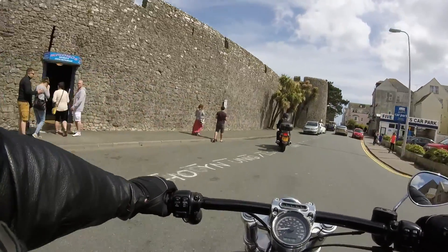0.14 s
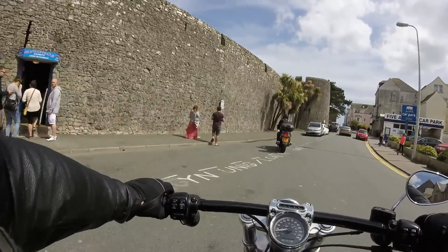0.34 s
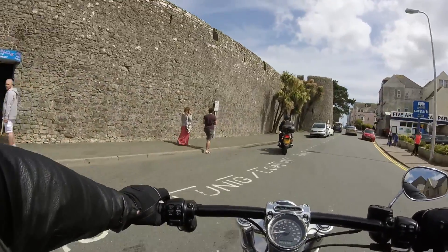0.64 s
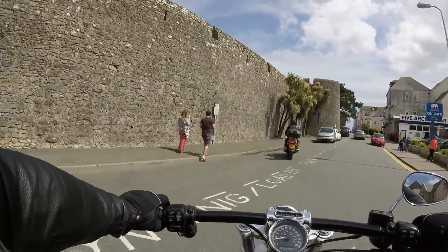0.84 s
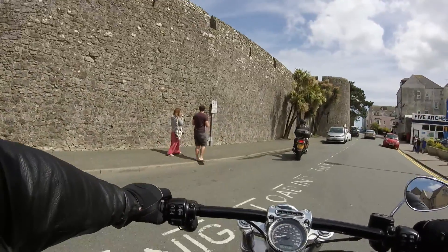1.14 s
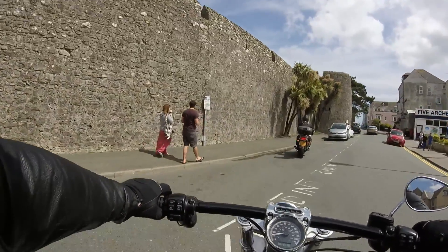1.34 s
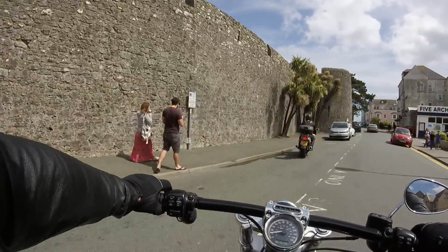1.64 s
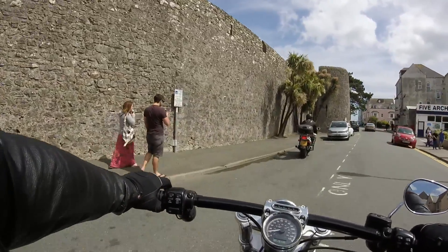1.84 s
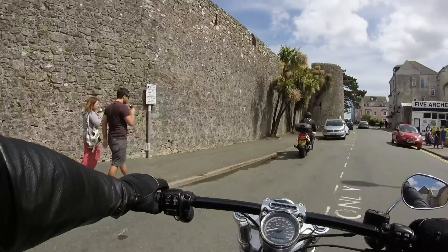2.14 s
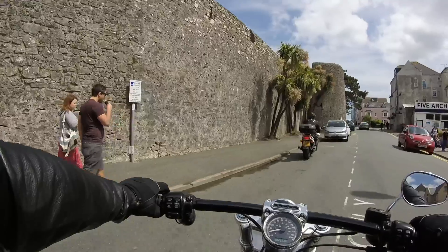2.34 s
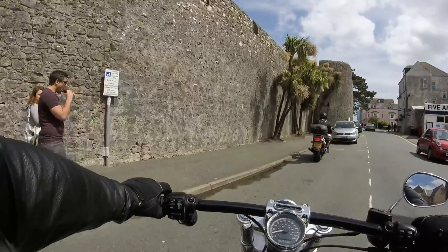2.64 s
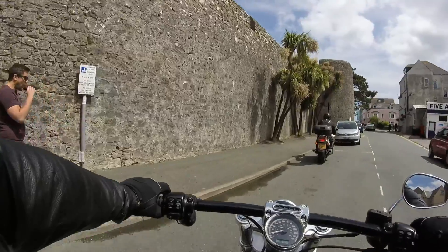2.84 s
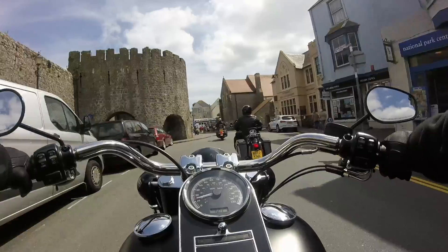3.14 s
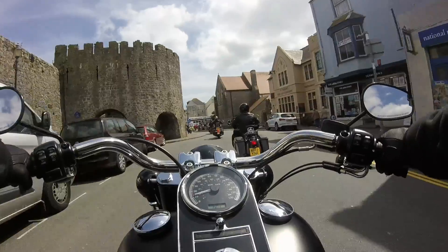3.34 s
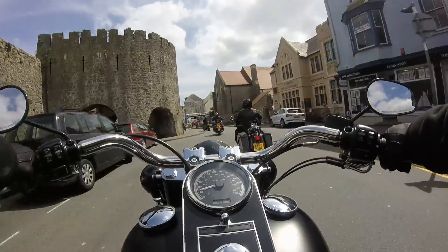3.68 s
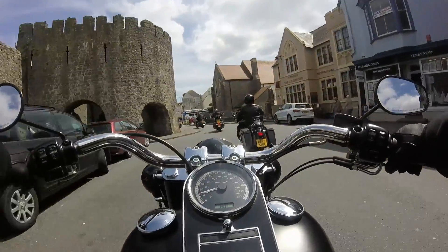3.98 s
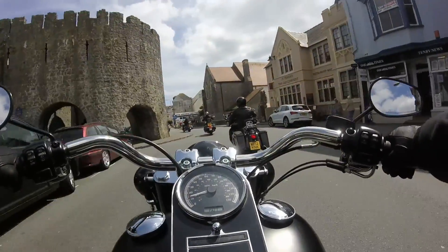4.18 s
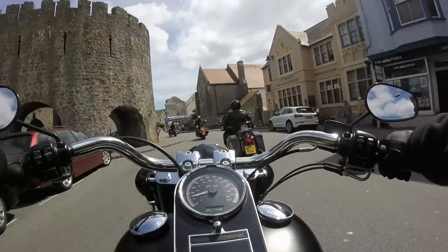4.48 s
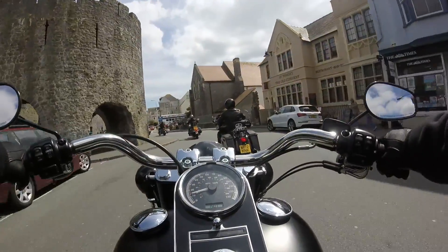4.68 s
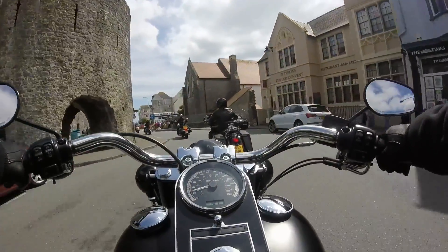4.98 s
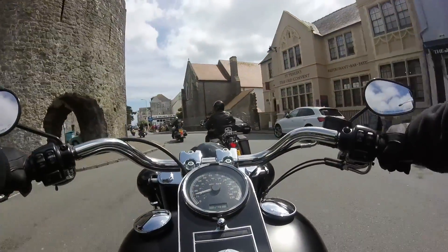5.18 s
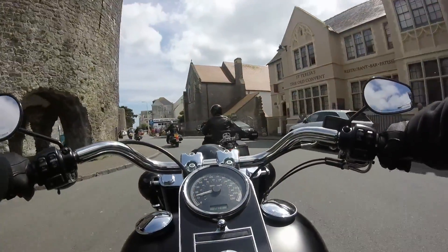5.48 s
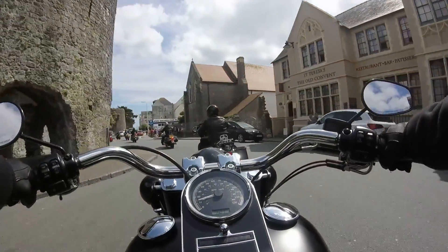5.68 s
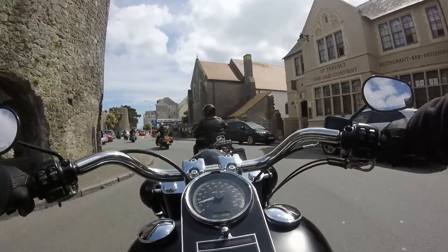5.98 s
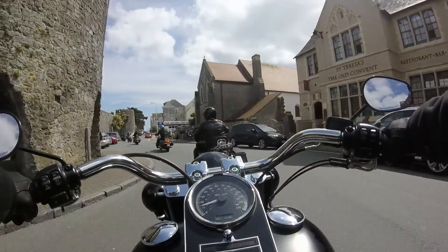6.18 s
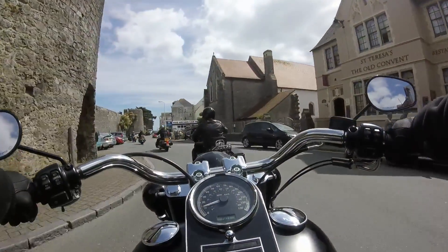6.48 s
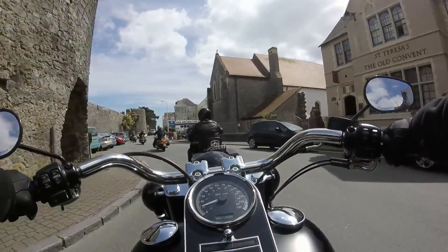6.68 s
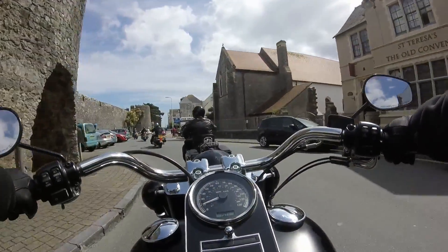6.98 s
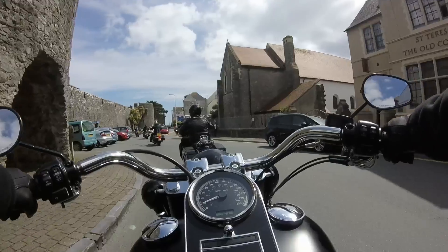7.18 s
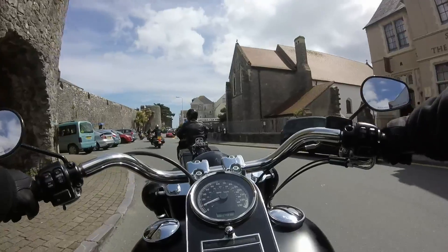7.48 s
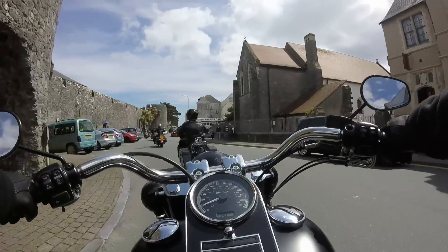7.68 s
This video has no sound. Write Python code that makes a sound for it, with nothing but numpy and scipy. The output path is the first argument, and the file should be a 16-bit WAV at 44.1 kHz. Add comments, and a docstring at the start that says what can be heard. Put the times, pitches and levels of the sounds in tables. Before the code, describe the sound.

From the saddle, a loud open-piped V-twin motorcycle lopes down toward idle, then a click cuts to a quieter muffled one that coasts and idles.

```python
"""Riding slowly along a street, heard from the saddles of two big V-twin motorcycles in turn.
First an open-piped one lopes loudly down to near idle, with cracks, a lever click and a faint whistle.
A dry click switches to a well muffled one: it cruises, knocks over a bump, then coasts with the throttle
shut, clanking and ticking, and sinks to idle. Firings are gliding sine rings; gas, valve gear and street
are filtered noise; blows are dying modes."""
import sys
import numpy as np
from scipy import signal
from scipy.fft import rfft, irfft
from scipy.io import wavfile
from scipy.ndimage import uniform_filter1d

SR = 44100
rng = np.random.default_rng(int(sys.argv[2]) if len(sys.argv) > 2 else 0)


def log_audio(samples):
    """Write samples as a 16-bit WAV file to the path given in sys.argv[1]."""
    # one column per channel
    frames = np.atleast_2d(samples).T
    # limit to full scale, then quantise
    limited = np.clip(frames, -1, 1)
    pcm = np.round(limited * 32767).astype(np.int16)
    wavfile.write(sys.argv[1], SR, pcm)


N = 344862
TIME = np.arange(N) / SR


def amp(db):
    """Decibels to gain."""
    return 10 ** (np.asarray(db) / 20)


def unit(x):
    """Scales to rms 1."""
    return x / np.sqrt(np.mean(x ** 2) + 1e-20)


def levelled(x):
    """Scales to rms 1 over every few engine cycles."""
    power = abs(uniform_filter1d(x ** 2, size=SR // 3))
    return x / np.sqrt(power + 1e-9)


def add(mix, start_s, sound):
    """Mixes a sound in from start_s, dropping what falls outside."""
    at = int(round(start_s * SR))
    sound = sound[max(-at, 0):]
    part = mix[max(at, 0):][:len(sound)]
    part += sound[:len(part)]


def curves(rows):
    """One control, linear between rows, for each column after the time."""
    row_s, *columns = np.transpose(rows)
    return [np.interp(TIME, row_s, column) for column in columns]


def plateau(start_s, rise_s, hold_s, fall_s):
    """An envelope from 0 up to 1 and back."""
    return np.interp(TIME, start_s + np.cumsum([0, rise_s, hold_s, fall_s]), [0, 1, 1, 0])


def noise():
    """White noise."""
    return rng.standard_normal(N)


def colour(x, spectrum, skirt_db=60):
    """Filters by a spectrum that falls by skirt_db an octave beyond its ends; rms 1."""
    hz, db = np.transpose(spectrum)
    octave = np.log2(np.fft.rfftfreq(N, 1 / SR) + 1)
    known = np.log2(hz + 1)
    outside = abs(octave - np.clip(octave, known[0], known[-1]))
    gain = amp(np.interp(octave, known, db) - skirt_db * outside)
    return unit(irfft(rfft(x) * gain, N))


def sing(rings, shake):
    """Shaking keeps narrow resonances sounding."""
    spectrum, f = rfft(shake), np.fft.rfftfreq(N, 1 / SR)
    out = np.zeros(N)
    for hz, width_hz, db in rings:
        resonance = 1 / (1 + 1j * (f - hz) / width_hz) ** 2
        out += amp(db) * unit(irfft(spectrum * resonance, N))
    return out


def bursts(turns, angles, decay_cycles, steady):
    """Noise that flares at the given points of each cycle and dies away."""
    gate = sum(np.exp(-((turns - angle) % 1) / decay_cycles) for angle in angles)
    return (steady + gate) * noise()


def rattle(per_s, spread_db):
    """Random small metal contacts, a few of them larger or smaller; rms 1."""
    size = amp(spread_db * np.minimum(rng.exponential(1, N), 4))
    hit = rng.random(N) < per_s / SR
    return unit(size * noise() * hit)


def strike(modes, contact_s, tuning=1):
    """The dying ring of one blow; a longer contact gives a softer start."""
    t = np.arange(SR // 8) / SR
    ring = sum(amp(db - 60 * t / t60_s) * np.sin(2 * np.pi * hz * tuning * t) for hz, db, t60_s in modes)
    return ring * (1 - np.exp(-(t / contact_s) ** 2))


def crack(decay_s):
    """The broad tick of metal meeting metal."""
    t = np.arange(SR // 30) / SR
    return rng.standard_normal(len(t)) * np.exp(-t / decay_s)


def crank(speed, start):
    """Cycles turned so far, given the position in the cycle at the first row."""
    turns = np.cumsum(curves(speed)[0]) / SR
    return turns - np.interp(speed[0][0], TIME, turns) + start


def pipe(turns, rings, uneven_db, jitter_s, detune, warmth=1):
    """Each firing rings the exhaust; pitch glides as the piston changes the open volume. Even rms 1."""
    out, cycles = np.zeros(N), np.arange(-1, int(turns[-1]) + 1)
    # extended two cycles back: the engine is already running
    lead_in_s = -2 / (SR * (turns[1] - turns[0]))
    known_turns, known_s = np.r_[turns[0] - 2, turns], np.r_[lead_in_s, TIME]
    # no two cycles burn alike: stronger or weaker, early or late, hotter gas ringing higher
    forces, lates, heats = rng.standard_normal((len(cycles), 3)).T
    tunings = np.interp(cycles, turns, warmth * np.ones(N)) * (1 + detune * heats)
    for angle, first_hz, crest_hz, last_hz, rise_s, fall_s, db in rings:
        t = np.arange(0, rise_s + fall_s, 1 / SR)
        knots_s = [0, rise_s, rise_s + fall_s]
        swell = np.sin(np.pi / 2 * np.interp(t, knots_s, [0, 1, 0])) ** 2
        glide_hz = np.interp(t, knots_s, [first_hz, crest_hz, last_hz])
        phase = 2 * np.pi * np.cumsum(glide_hz) / SR
        starts_s = np.interp(cycles + angle, known_turns, known_s) + jitter_s * lates
        for start_s, force, tuning in zip(starts_s, forces, tunings):
            add(out, start_s, amp(db + uneven_db * force) * swell * np.sin(phase * tuning))
    return levelled(out)


IDLE_CYCLES_PER_S = 8.4


def drive(law, speed, throttle, lag_s=0):
    """Layer gain; law = (dB at idle, dB per doubling of speed, dB per dB of effort)."""
    idle_db, doubling_db, effort_share = law
    rate = np.interp(TIME - lag_s, TIME, curves(speed)[0])
    effort_db = curves(throttle)[0]
    return amp(idle_db + doubling_db * np.log2(rate / IDLE_CYCLES_PER_S) + effort_share * effort_db)


# loud bike, engine speed: (time [s], four-stroke cycles per second [1/s])
LOUD_SPEED = [(0, 10.69), (.35, 10.86), (.7, 9.92), (1.1, 8.95), (1.5, 8.61), (2, 8.65), (2.3, 8.5),
              (2.6, 8.81), (3.08, 7.74)]
# loud bike, throttle hand: (time [s], effort [dB])
LOUD_THROTTLE = [(0, -0.8), (0.451, -1.5), (.85, 0.7), (1.3, -1), (1.85, 0.4), (2.25, -0.9), (2.65, -0.5),
                 (3.08, 2)]


def loud_gain(law):
    """Gain of a loud-bike layer from its speed and throttle."""
    return drive(law, LOUD_SPEED, LOUD_THROTTLE)


# quiet bike, engine speed: (time [s], four-stroke cycles per second [1/s])
QUIET_SPEED = [(3.08, 12.45), (3.5, 11.83), (4.3, 12.2), (4.75, 11.84), (5.05, 12.06), (5.35, 11.13),
               (5.7, 10.32), (5.95, 8.23), (6.4, 8.55), (6.9, 8.01), (7.3, 8.43), (7.82, 8.5)]
# quiet bike, throttle hand: (time [s], effort [dB])
QUIET_THROTTLE = [(3.08, -2), (3.6, 2.7), (4.1, 0.5), (4.55, -.6), (4.78, 1.4), (5.15, -0.91), (6.1, 0.21),
                  (6.85, 1.3), (7.2, -1), (7.82, -0.33)]


def quiet_gain(law, lag_s=0):
    """Gain of a quiet-bike layer from its speed, optionally late, and throttle."""
    return drive(law, QUIET_SPEED, QUIET_THROTTLE, lag_s)


SHUT_S, SHUT_FADE_S = 5.03, .153


def quiet_load():
    """Pull on the quiet engine: 1 until the throttle shuts, then 0."""
    return np.interp(TIME, [SHUT_S, SHUT_S + SHUT_FADE_S], [1, 0])


# rumble of street and other riders: (frequency [Hz], relative density [dB per Hz])
LOUD_STREET = [(10, -12), (25, -18.5), (45, -6.5), (75, -4), (120, -2), (200, -14.5), (400, -26.5),
               (1000, -69)]


def loud_street():
    """Low filtered noise around the loud bike."""
    return amp(-20.5) * colour(noise(), LOUD_STREET)


# mostly deep tyre and wind rumble: (frequency [Hz], relative density [dB per Hz])
QUIET_STREET = [(10, -10), (25, -7), (45, -3.5), (75, -5), (120, -1), (200, -15), (400, -29.5), (1000, -71)]


def quiet_street():
    """Low filtered noise around the quiet bike, a little stronger off the throttle."""
    return amp(-39.5 - 1.5 * quiet_load()) * colour(noise(), QUIET_STREET)


WHISTLE_S, WHISTLE_FADE_S, WHISTLE_HOLD_S = .68, .12, 1.15
WHISTLE_DB, WHISTLE_HZ = -75, 11880


def whistle():
    """A thin, very faint tone whose amplitude wavers with slow noise."""
    waver = colour(noise(), [(3, 2), (20, -6), (45, -16)])
    swell = plateau(WHISTLE_S, WHISTLE_FADE_S, WHISTLE_HOLD_S, WHISTLE_FADE_S)
    return amp(WHISTLE_DB) * swell * waver * np.sin(2 * np.pi * WHISTLE_HZ * TIME)


SWITCH_S, SWITCH_FADE_S = 3.0783, .002
SNAP_DB, SNAP_DECAY_S = -12, .0002


def snap():
    """One dry click, a decaying pulse, as the sound switches."""
    out, t = np.zeros(N), np.arange(SR // 100) / SR
    add(out, SWITCH_S, amp(SNAP_DB) * np.exp(-t / SNAP_DECAY_S))
    return out


LEVER_S, LEVER_DB, LEVER_CRACK_DB = .78, -31.5, -47
# lever modes: (frequency [Hz], level [dB], t60 [s])
LEVER_MODES = [(1770, 4, .018), (3150, 5, .014), (4720, -1, .013), (7100, -9, .014), (8400, -12, .012)]


def lever():
    """A lever clicks: ringing modes plus a short noise crack."""
    out = np.zeros(N)
    add(out, LEVER_S, amp(LEVER_DB) * strike(LEVER_MODES, contact_s=.0012))
    add(out, LEVER_S, amp(LEVER_CRACK_DB) * crack(decay_s=.002))
    return out


# frame knocks on the uneven road: (time [s], gain [dB])
BUMPS = [(4.0848, -9.8), (5.102, -32), (5.287, -25), (5.374, -30)]
# frame modes: (frequency [Hz], level [dB], t60 [s])
BUMP_MODES = [(235, 4, .028), (310, 2, .022), (880, -19, .012), (1460, -14, .024)]


def bumps():
    """The road strikes the frame, which rings low and short."""
    out = np.zeros(N)
    for start_s, db in BUMPS:
        add(out, start_s, amp(db) * strike(BUMP_MODES, contact_s=.0035))
    return out


TICK_PITCH_HZ = 8000
# sharp metal ticks: (time [s], gain [dB], pitch [Hz])
TICKS = [(4.6882, -51, 6300), (4.996, -55, 7400), (5.1242, -55, 7800), (5.209, -48, 8000),
         (5.2885, -53, 8400), (5.3215, -56, 8600), (5.3951, -53, 6400), (5.5113, -54, 7600),
         (5.5427, -57, 8600), (5.5846, -56, 8700), (5.6171, -56, 8700), (5.6585, -50, 8450),
         (5.734, -48, 8700), (5.7672, -49, 6400), (5.8091, -52, 6300), (5.8433, -55, 6700),
         (5.886, -57, 7850), (5.9199, -57, 6700), (5.9653, -59, 8350), (5.9997, -53, 6400),
         (6.0441, -55, 7900), (6.078, -54, 6000), (6.1229, -55, 8200), (6.1583, -51, 6650),
         (6.2042, -52, 7350), (6.2387, -57, 6200), (7.4205, -52, 6100), (7.4863, -59, 8400)]
# tick modes at TICK_PITCH_HZ: (frequency [Hz], level [dB], t60 [s])
TICK_MODES = [(6000, -3, .012), (7100, -1, .013), (8000, 2, .016), (8700, -1, .013), (9900, -6, .01)]


def ticks():
    """Hard, brief metal contacts; the modes scale with each tick's pitch."""
    out = np.zeros(N)
    for start_s, db, hz in TICKS:
        add(out, start_s, amp(db) * strike(TICK_MODES, contact_s=.0002, tuning=hz / TICK_PITCH_HZ))
    return out


POP_PITCH_HZ = 620
# harder cracks of the open pipes: (time [s], gain [dB], pitch [Hz])
POPS = [(.342, -20, 455), (.368, -15, 403), (.72, -19, 700), (.935, -27, 630), (1.083, -17, 625),
        (1.264, -23, 620), (1.386, -24, 402), (1.465, -27, 610), (1.58, -16, 624), (1.644, -20, 600),
        (1.803, -18, 583), (1.842, -22, 618), (2.429, -32, 625), (2.658, -20, 586), (2.787, -18.5, 556),
        (2.899, -19, 522)]
# pop modes at POP_PITCH_HZ: (frequency [Hz], level [dB], t60 [s])
POP_MODES = [(470, -7, .02), (620, 1, .04), (780, -5, .02)]


def pops():
    """Now and then a firing cracks harder and rings the open pipes."""
    out = np.zeros(N)
    for start_s, db, hz in POPS:
        add(out, start_s, amp(db) * strike(POP_MODES, contact_s=.0016, tuning=hz / POP_PITCH_HZ))
    return out


# bright ticking of tappets and cooling fins: (frequency [Hz], relative density [dB per Hz])
LOUD_FINS = [(2650, -26.5), (4500, -3), (5370, -6.5), (5970, -13), (6470, -11), (6980, -6), (7790, -16.5),
             (8580, -9), (10500, -18.5), (11600, -16), (12300, -20), (14400, -33.5), (15000, -38.5)]


def loud_fins():
    """Steady noise and random contacts through the fin spectrum."""
    return amp(-57) * colour(noise() + .5 * rattle(490, spread_db=4), LOUD_FINS)


# bright ticking of tappets and cooling fins: (frequency [Hz], relative density [dB per Hz])
QUIET_FINS = [(2650, -40), (4500, -11), (5000, -7.5), (5500, -8), (6000, -1.5), (7080, -5.5), (8710, -6),
              (10600, -17), (14300, -28), (15000, -33)]


def quiet_fins(turns):
    """Tappet bursts in each cycle, and random contacts, through the fin spectrum."""
    tappets = unit(bursts(turns, [.12, .58, .84], decay_cycles=.06, steady=1.9))
    return amp(-16.5) * colour(tappets + .34 * rattle(300, spread_db=3.5), QUIET_FINS)


LOUD_CLATTER = (-46, 8.7, 1)  # drive law
# case rung by gears and valves: (frequency [Hz], relative density [dB per Hz])
LOUD_CASE = [(590, -30.5), (1000, -5.5), (1160, -7.5), (1270, 0.5), (1470, -6.5), (1660, -6), (1950, -7.5),
             (2270, -3), (2560, -11), (3050, -11.5), (3370, -7.5), (4070, -15), (4800, -20), (6240, -36),
             (10600, -120)]
# narrow case rings: (frequency [Hz], width [Hz], level [dB])
LOUD_CASE_RINGS = [(2275, 70, -12), (2777, 30, -17)]


def loud_case(turns):
    """Gear bursts and random contacts shake the engine case; noise sustains its narrow rings."""
    gears = unit(bursts(turns, [.06, .29, .8], decay_cycles=.063, steady=1.7))
    contacts = gears + .35 * rattle(900, spread_db=-1.5)
    return loud_gain(LOUD_CLATTER) * (colour(contacts, LOUD_CASE) + sing(LOUD_CASE_RINGS, noise()))


CLANK_DECAY_S = .009
# clanks of the slack gears: (time [s], level over the steady clatter [dB])
CLANKS = [(4.4428, -1), (5.0334, 1), (5.0748, 6.5), (5.1028, 4), (5.1611, 3), (5.2479, 4.5), (5.259, 1),
          (5.2869, 1), (5.399, -4), (5.5248, -2), (5.617, 1), (5.8496, -1), (5.922, 2), (6.158, 8),
          (6.2028, 5)]


def lash():
    """Case gain, flaring each time the slack gears clank together."""
    flare, t = np.zeros(N), np.arange(SR // 10) / SR
    for start_s, db in CLANKS:
        add(flare, start_s, amp(db) * np.exp(-t / CLANK_DECAY_S))
    return np.sqrt(1 + flare ** 2)


# case rung by gears and valves: (frequency [Hz], relative density [dB per Hz])
QUIET_CASE = [(590, -9), (1000, -10), (1280, -4), (1380, 0.5), (1490, 2), (1740, -6.5), (2160, 0.5),
              (2460, -6.5), (2800, -8), (3090, -6), (3240, -3.5), (3670, -13.5), (4180, -14), (4410, -18.5),
              (4800, -29.5), (6240, -55), (10600, -120)]
# narrow case rings: (frequency [Hz], width [Hz], level [dB])
QUIET_CASE_RINGS = [(1460, 60, -21.5), (1529, 50, -20), (2105, 56, -26), (2300, 45, -24), (3020, 28, -24),
                    (3200, 76, -20.5), (4096, 67, -27.5), (8450, 110, -35)]


def quiet_case(turns):
    """Valve bursts, random contacts and gear clanks ring the engine case."""
    valves = unit(bursts(turns, [.24, .58, .8, .94], decay_cycles=.041, steady=3))
    contacts = lash() * (valves + .35 * rattle(900, spread_db=2))
    return amp(-.5) * colour(contacts, QUIET_CASE) + sing(QUIET_CASE_RINGS, contacts)


LOUD_GAS = (-31, 3.1, .89)  # drive law
# gas rushing from the pipes: (frequency [Hz], relative density [dB per Hz])
LOUD_PUFF = [(190, -29.5), (330, 1.5), (360, -4.5), (449, -4.5), (566, -5), (641, -4), (863, -15),
             (1200, -26.5), (1560, -64.5), (2640, -120)]
# narrow pipe ring: (frequency [Hz], width [Hz], level [dB])
LOUD_PUFF_RINGS = [(633, 40, -18.5)]
# rasp at each valve event: (start [share of cycle], first [Hz], crest [Hz], last [Hz], rise [s],
# fall [s], level [dB])
LOUD_RASP = [(.0, 500, 635, 700, .007, .018, -1), (.29, 590, 650, 690, .007, .018, 1),
             (.57, 480, 660, 800, .006, .02, -2), (.66, 330, 420, 620, .008, .022, -1)]


def loud_gas(turns):
    """Gas bursts rush from the open pipes; short rising rings rasp with them."""
    gas = bursts(turns, [.01, .32, .57], decay_cycles=.085, steady=.85)
    puffs = colour(gas, LOUD_PUFF) + sing(LOUD_PUFF_RINGS, gas)
    rasp = amp(-6.5) * pipe(turns, LOUD_RASP, uneven_db=2, jitter_s=.001, detune=.02)
    return loud_gain(LOUD_GAS) * (puffs + rasp)


# the wheel drives the engine once the throttle is shut
OVERRUN_S, OVERRUN_RISE_S, OVERRUN_HOLD_S, OVERRUN_FALL_S = 5.15, .29, .39, .37
QUIET_GAS = (-48.5, 6.8, .088)  # drive law
# gas under throttle: (frequency [Hz], relative density [dB per Hz])
QUIET_PUFF = [(150, -19), (260, 1.5), (301, -5.5), (340, 0.5), (387, -5.5), (415, -1.5), (460, -14.5),
              (496, -6.5), (550, -18), (649, -8.5), (757, -18), (1200, -20), (1560, -39), (2640, -120)]
# gas at idle: (frequency [Hz], relative density [dB per Hz])
IDLE_PUFF = [(150, -34), (260, -2), (295, 0), (334, -15), (360, -9.5), (499, -14.5), (522, -14.5),
             (625, -8.5), (738, -18), (1200, -25), (1560, -46), (2640, -120)]


def quiet_gas(turns):
    """Gas rush from the muffled pipes, crossfading to the idle spectrum as the engine coasts."""
    gas = bursts(turns, [.05, .2], decay_cycles=.18, steady=6.7)
    flow = np.interp(TIME, [OVERRUN_S, OVERRUN_S + OVERRUN_RISE_S], [.95, .14])
    return quiet_gain(QUIET_GAS) * (flow * colour(gas, QUIET_PUFF) + (1 - flow) * colour(gas, IDLE_PUFF))


LOUD_BOOM, LOUD_UPPER, LOUD_RINGING = (-12, -7, .47), (-25, -6, .9), (-26, -13, 1)  # drive laws
# pipe ring tables: (start [share of cycle], first [Hz], crest [Hz], last [Hz], rise [s], fall [s],
# level [dB]); low boom, upper sweeps, drone
LOUD_PIPE = [(0, 68.7, 116.5, 96, .033, .066, 0), (.564, 103.5, 71.2, 95.8, .016, .083, -3.3),
             (.977, 248.5, 72.5, 144.7, .014, .02, -3.2)]
LOUD_UPPER_PIPE = [(.598, 120, 186, 381, .005, .039, 0), (.044, 115, 200, 356, .005, .026, -9)]
LOUD_DRONE = [(.681, 250, 302, 276, .022, .078, 0)]


def loud_exhaust(turns):
    """Firings ring the open pipes; the slower the beat, the fuller each boom."""
    boom = pipe(turns, LOUD_PIPE, uneven_db=1.1, jitter_s=.00026, detune=.019)
    sweeps = pipe(turns, LOUD_UPPER_PIPE, uneven_db=1.5, jitter_s=.0003, detune=.012)
    drone = pipe(turns, LOUD_DRONE, uneven_db=2.3, jitter_s=.0003, detune=.01)
    return loud_gain(LOUD_BOOM) * boom + loud_gain(LOUD_UPPER) * sweeps + loud_gain(LOUD_RINGING) * drone


QUIET_BOOM, QUIET_UPPER = (-35.5, 2.6, .85), (-44.5, 14.5, .38)  # drive laws
PULL_BOOM_DB, PULL_UPPER_DB = 3.5, -7.5
OVERRUN_UPPER_DB, OVERRUN_SHARPEN = -.3, .16  # sharpening as a share of pitch
STUMBLE_S, STUMBLE_WIDTH_S, STUMBLE_DB = 5.87, .04, -18
# pipe ring tables: (start [share of cycle], first [Hz], crest [Hz], last [Hz], rise [s], fall [s],
# level [dB]); low rings pulling, low rings on a shut throttle, upper rings
QUIET_PIPE = [(.603, 151.4, 100, 40, 0.0218, 0.126, -1.5), (0.296, 121.3, 72.8, 49, 0.0242, 0.075, 0.5),
              (.935, 107.5, 155.7, 250, 0.021, 0.014, -3), (0.3232, 87, 172.9, 178, 0.0232, 0.072, -7.5)]
IDLE_PIPE = [(.76, 105, 86.3, 51, 0.015, 0.09, -3), (0.354, 101, 80.5, 44, 0.016, 0.059, 1.5),
             (.47, 154.4, 139, 160, 0.041, 0.017, -6.5)]
QUIET_UPPER_PIPE = [(0.0565, 122, 137.6, 230, 0.0085, 0.035, 4), (.46, 129, 164.6, 209, 0.0092, 0.032, 1),
                    (0.84, 214, 334, 530, 0.0167, 0.013, -18), (.1412, 274, 290, 387, 0.0086, 0.015, -23)]


def quiet_exhaust(turns):
    """Firings ring the muffled pipes; off the throttle the boom drops, upper rings swell and go sharp."""
    load = quiet_load()
    overrun = plateau(OVERRUN_S, OVERRUN_RISE_S, OVERRUN_HOLD_S, OVERRUN_FALL_S)
    pulling = amp(PULL_BOOM_DB) * pipe(turns, QUIET_PIPE, uneven_db=1.1, jitter_s=.00013, detune=.0033)
    idling = pipe(turns, IDLE_PIPE, uneven_db=1.5, jitter_s=.001, detune=.02)
    boom = quiet_gain(QUIET_BOOM) * (np.sqrt(load) * pulling + np.sqrt(1 - load) * idling)
    high_rings = pipe(turns, QUIET_UPPER_PIPE, uneven_db=2.5, jitter_s=.00041, detune=.017,
                      warmth=1 + OVERRUN_SHARPEN * overrun)
    upper_db = OVERRUN_UPPER_DB * overrun + PULL_UPPER_DB * load
    upper = quiet_gain(QUIET_UPPER) * amp(upper_db) * high_rings
    # a missed beat on the drop to idle: the firing level dips briefly
    firing = amp(STUMBLE_DB * np.exp(-((TIME - STUMBLE_S) / STUMBLE_WIDTH_S) ** 2))
    return firing * (boom + upper)


def loud_bike():
    """Open pipes, slowing to a lumpy near-idle."""
    turns = crank(LOUD_SPEED, .65)
    engine = loud_exhaust(turns) + loud_gas(turns) + loud_case(turns) + loud_fins()
    return loud_street() + whistle() + pops() + engine


QUIET_CLATTER = (-48.5, 7.8, .17)  # drive law
GEAR_LAG_S = .25  # gearbox follows the wheel: clatter dies down later than the engine


def quiet_bike():
    """Muffled pipes, so the valve gear stands out: pulls, coasts on a shut throttle, idles."""
    turns = crank(QUIET_SPEED, .5)
    clatter = quiet_gain(QUIET_CLATTER, GEAR_LAG_S) * (quiet_case(turns) + quiet_fins(turns))
    return quiet_street() + clatter + quiet_gas(turns) + quiet_exhaust(turns)


def scene():
    """The scene changes abruptly from one bike to the other."""
    first = np.interp(TIME, [SWITCH_S - SWITCH_FADE_S, SWITCH_S], [1, 0])
    bikes = first * loud_bike() + (1 - first) * quiet_bike()
    return (bikes + lever() + bumps() + ticks() + snap())[None]


CUTOFF_HZ = 15200


def record(dry):
    """A 4 ms fade-in, then a low-pass band limit."""
    opened = dry * np.minimum(TIME / .004, 1)
    low_pass = signal.firwin(511, CUTOFF_HZ, window=("kaiser", 9), fs=SR)
    return signal.oaconvolve(opened, low_pass[None], "same")


dry = scene()
out = record(dry)
log_audio(out)
```